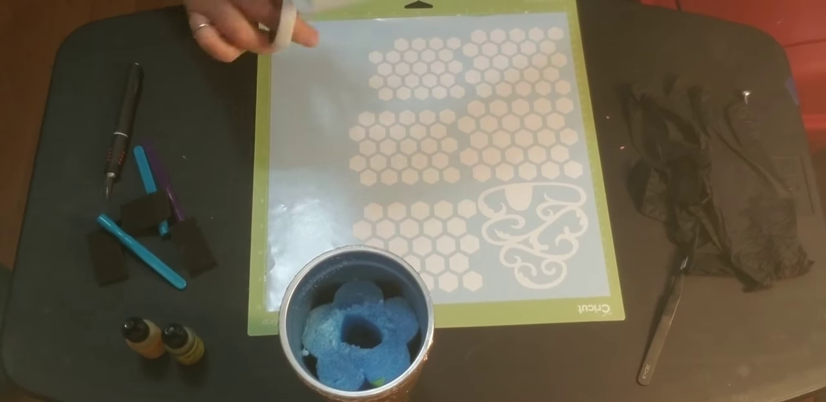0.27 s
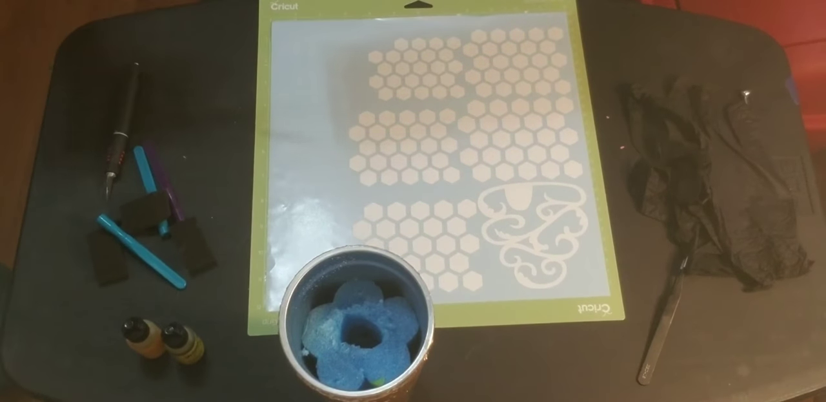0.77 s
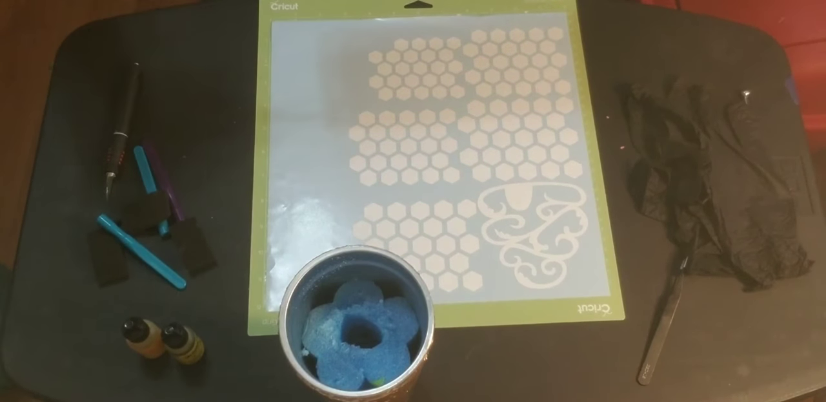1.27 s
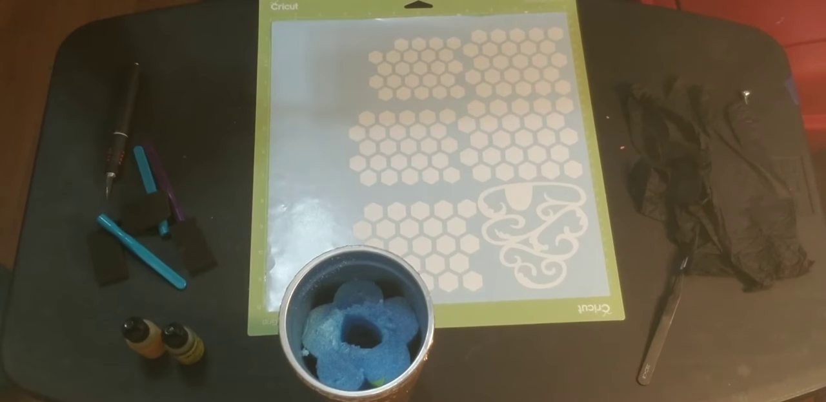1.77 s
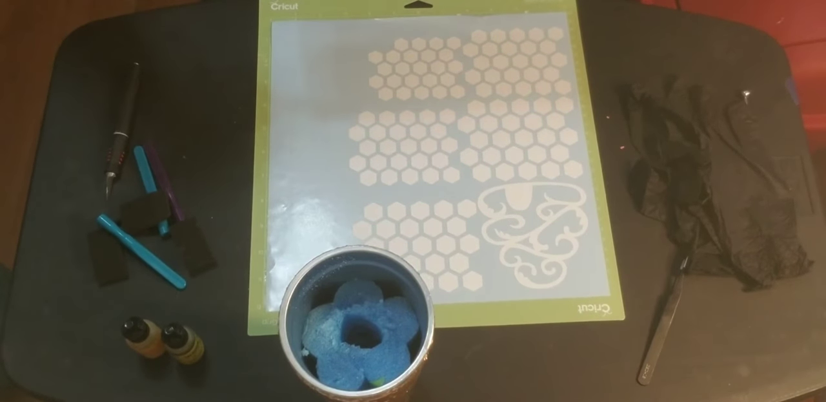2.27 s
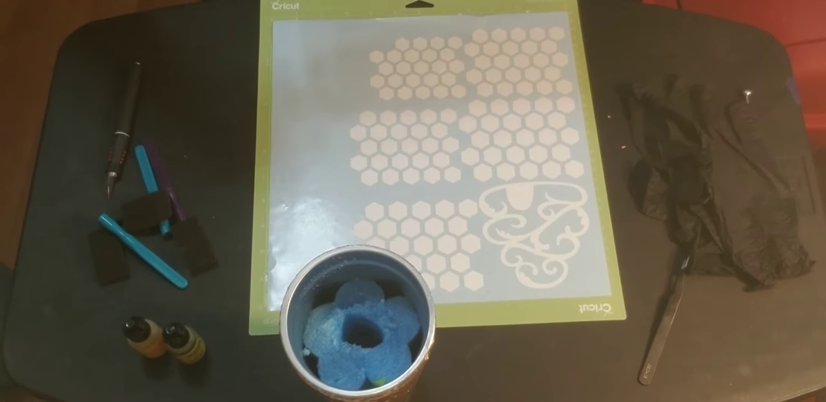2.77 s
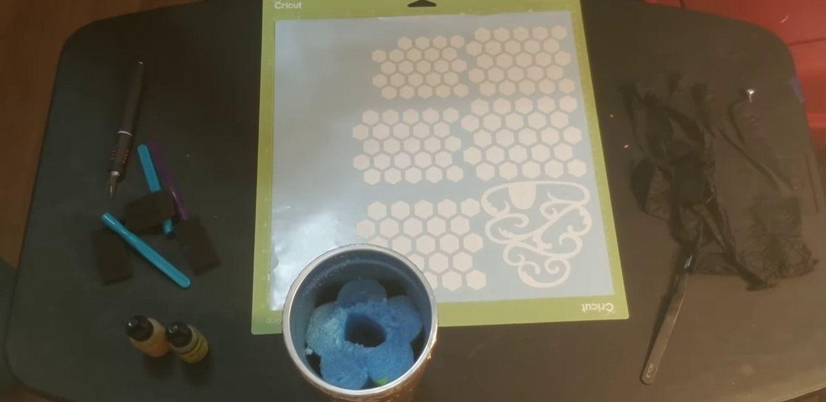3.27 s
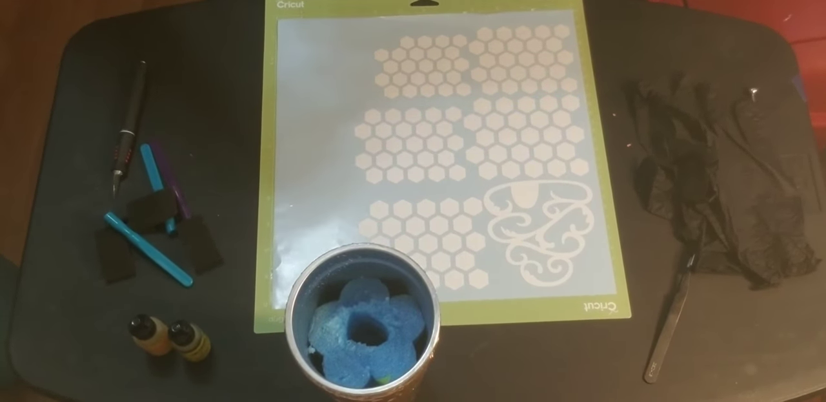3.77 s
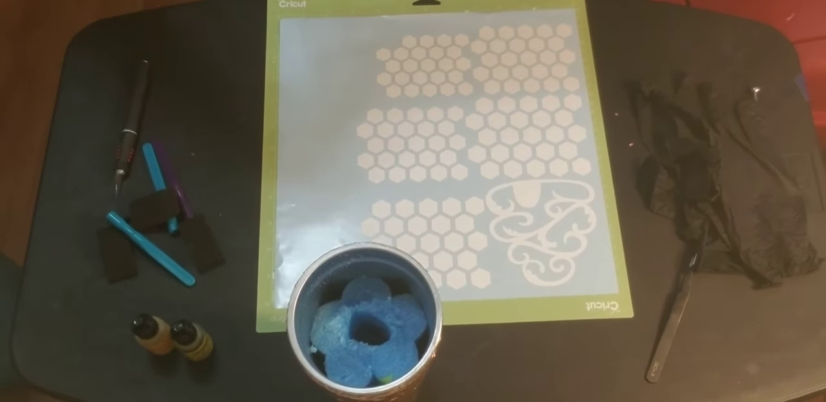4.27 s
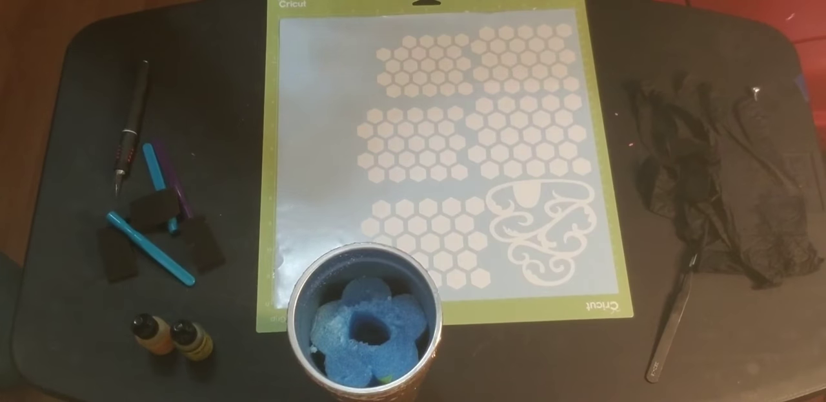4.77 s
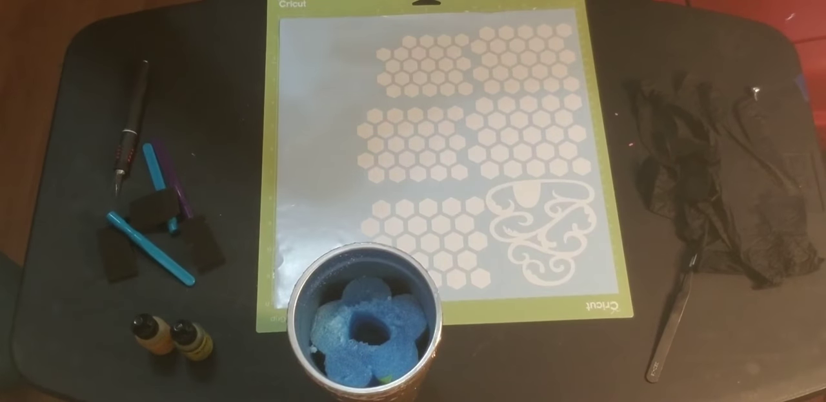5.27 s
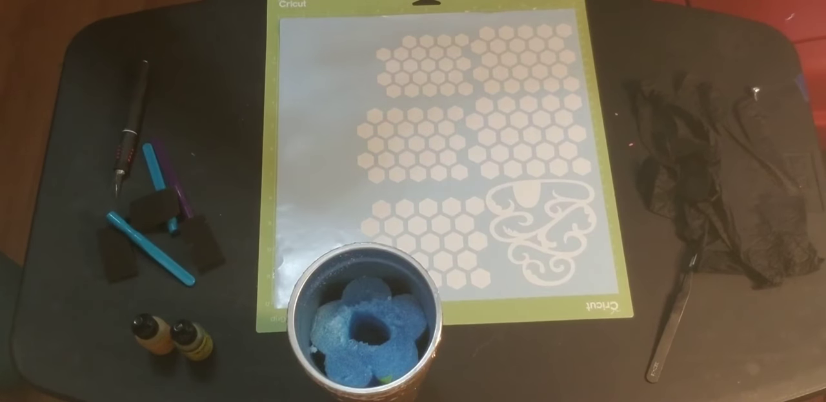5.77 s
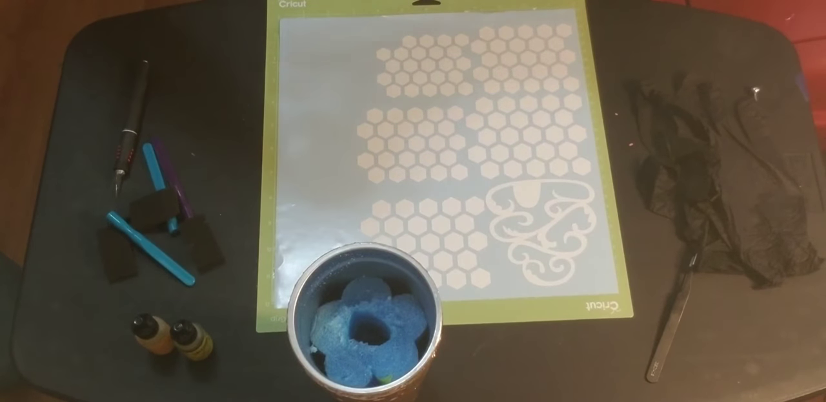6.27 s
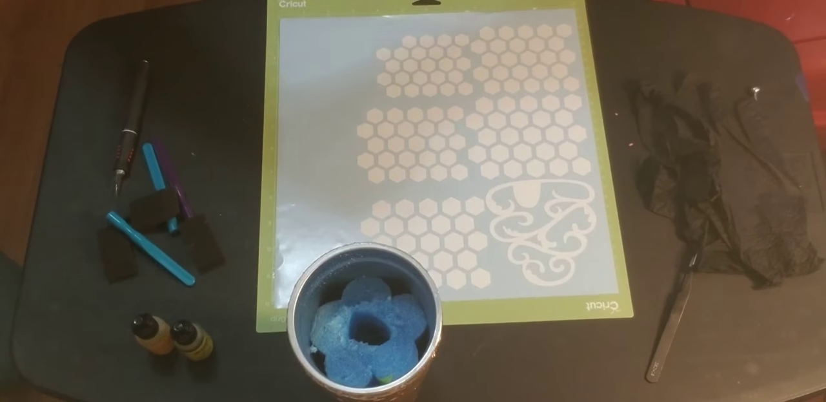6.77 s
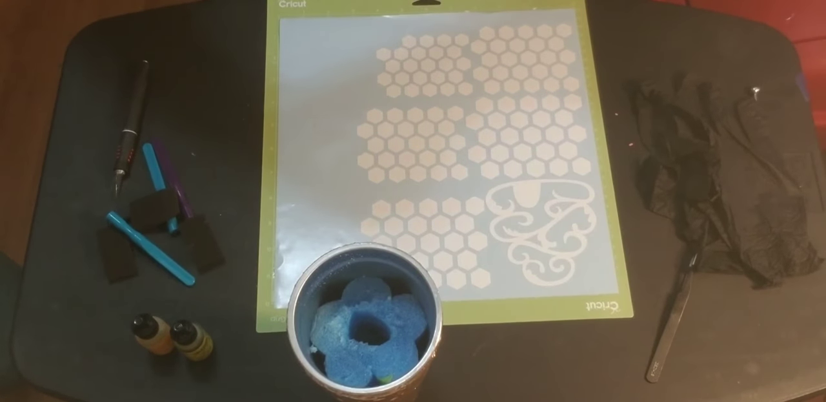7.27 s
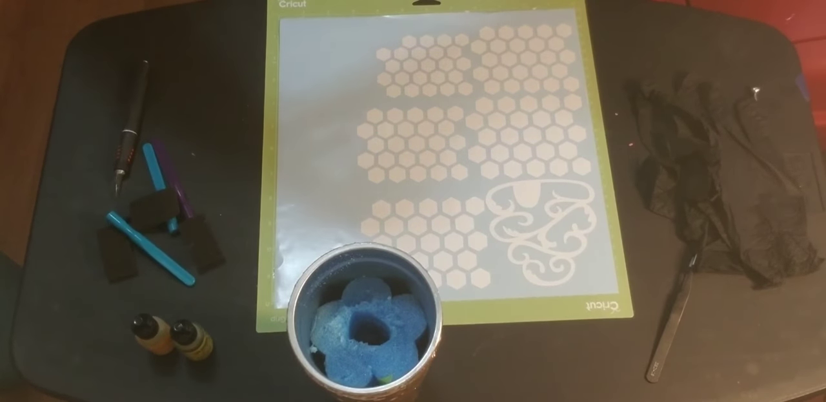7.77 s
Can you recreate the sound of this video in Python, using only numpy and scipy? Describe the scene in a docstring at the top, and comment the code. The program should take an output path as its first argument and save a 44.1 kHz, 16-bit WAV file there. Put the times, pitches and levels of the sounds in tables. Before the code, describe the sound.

Hands work a stiff clear plastic sheet beside a craft table. Faint rubbing and a few ticks come first, then a near lull, then stronger irregular rustles with crackles, creasing pops and short crunches. Soft low knocks fall underneath. Near the end the sheet is flicked sharply and settles. Close phone microphone, small room, short reflections, very quiet air and faint hum.

```python
"""A clear plastic transfer sheet, worked by hands beside a craft table, close to a phone in a small room.
Each stroke drags the film in a dense run of tiny slips that wake its resonances; slack film booms, taut
film rings, wrinkles tick. Creases buckle with single snaps or short crunches, and near the end the sheet
is flicked once. Table and walls answer; soft low knocks, still air and faint mains hum lie underneath."""
import sys
import numpy as np
from scipy import signal
from scipy.fft import rfft, irfft, next_fast_len
from scipy.io import wavfile

SR = 44100
rng = np.random.default_rng(int(sys.argv[2]) if len(sys.argv) > 2 else 0)


def wrap_up_sound(samples):
    """Save the sound to the file named by the first command line argument, as 16-bit audio."""
    columns = np.atleast_2d(samples).T
    # keep every value between -1 and 1, then stretch to whole-number steps
    tamed = np.clip(columns, -1, 1)
    steps = np.round(tamed * 32767).astype(np.int16)
    wavfile.write(sys.argv[1], SR, steps)


N = 353152
T = np.arange(N) / SR
SIZE = next_fast_len(N + SR)
FREQ = np.maximum(np.arange(SIZE // 2 + 1) * SR / SIZE, 1)

# hand strokes along the sheet: start t/s, rise/s, length/s, relative level/dB, swell over the stroke/dB,
# belly/dB, hiss/dB (belly and hiss against the 1-3 kHz rasp)
HAND_STROKES = [(0, 0.0013, 0.064, -48.5, -5, -6, 1), (0.06, 0.042, 0.28, -51.5, 4, -5, 3),
                (0.386, 0.0042, 0.034, -47, 2, 0, 4.5), (.47, .02, 0.052, -53, -2, -3.5, 4),
                (0.573, .02, 0.14, -54, -2.5, -8, 6.5), (1.218, 0.057, 0.12, -68, 1, -12, 24),
                (1.326, 0.045, 0.23, -55.5, -7, 7.5, 11.5), (1.526, 0.034, 0.099, -58, 9.5, 6, 14),
                (1.717, 0.079, 0.13, -41, 2.5, 1, 11.5), (1.96, 0.094, 0.14, -40, 3, -4.5, 1.5),
                (2.206, 0.033, 0.096, -39.5, -5, 3, 14), (2.377, 0.072, .21, -44.5, 2.5, 0, 1.5),
                (2.658, 0.011, 0.08, -32.5, 5.5, -3, 3.5), (2.86, 0.13, 0.23, -39.5, -7, -8.5, -7),
                (3.074, 0.0092, 0.16, -52.5, -8.5, 6.5, -1), (3.239, 0.044, 0.075, -35, 0, 0, 2.5),
                (3.475, 0.046, 0.14, -51, 12.5, 4, 3.5), (3.636, 0.017, 0.075, -46.5, -7, -1, 7),
                (3.766, 0.026, 0.14, -48.5, -8, -7.5, -3), (3.916, 0.018, 0.15, -49, -6, -3, 12),
                (4.015, 0.029, 0.058, -42.5, 3, -8, -2.5), (4.148, 0.048, 0.22, -38.5, -5, -9.5, 4),
                (4.428, 0.02, 0.062, -34, 2.5, -3, 4.5), (4.598, 0.11, .32, -45, -6, -2.5, -2.5),
                (4.951, 0.025, 0.064, -54, 6, -4, 6), (5.087, 0.023, .11, -37.5, 10, -9, 1.5),
                (5.243, 0.058, 0.06, -39, 2, 3, 4), (5.347, 0.019, 0.073, -44, -3, -2, 0.5),
                (5.529, 0.034, 0.082, -58.5, -4.5, -6, 1.5), (5.687, 0.032, 0.096, -51, -16.5, -15, 2),
                (5.832, 0.01, 0.19, -48.5, 13, -3, 1.5), (5.985, 0.16, 0.15, -42.5, 2, -3.5, -0.5),
                (6.23, 0.022, 0.16, -47.5, -8.5, -5, 0), (6.302, 0.022, 0.036, -37.5, 4, 7.5, 10),
                (6.447, 0.04, .18, -45, 7, 0, 6.5), (6.713, 0.023, 0.051, -37.5, -8, -5, 0.5),
                (6.89, 0.055, 0.1, -44, 9, -6.5, 5), (7.13, 0.0046, .018, -49, 5, -8, 8),
                (7.151, 0.0064, 0.05, -34.5, 3, -4, 5), (7.377, 0.024, 0.11, -51, -0.5, -4, 5),
                (7.632, 0.019, 0.019, -46.5, 4, -2, -2), (7.728, 0.025, 0.096, -41.5, -3.5, -5.5, -5),
                (7.992, 0.0035, 0.013, -49, 3, -10, 7)]
# taut stretches that ring while rubbed: start t/s, end t/s, f/Hz, width/Hz, level before trim/dB
TAUT_STRETCHES = [(0, .1, 3500, 900, -58), (.29, .335, 1920, 1500, -49), (1.32, 1.6, 4440, 1590, -56.5),
                  (2.44, 2.61, 1570, 400, -48), (2.88, 3.11, 1710, 750, -44),
                  (3.93, 4.27, 1950, 450, -50.5), (4.44, 4.52, 1470, 220, -41),
                  (4.65, 4.95, 1670, 710, -50), (6.03, 6.13, 1500, 200, -44),
                  (6.05, 6.14, 3100, 700, -40.5)]
# creases giving way together: t/s, relative level/dB, length/s, hiss against rasp/dB
CREASE_RUNS = [(0.4036, -43, 0.0088, 0), (0.666, -45.5, .0043, -12), (2.121, -38, 0.009, 4),
               (2.212, -40.5, 0.0049, 24), (2.661, -43, 0.0072, 14), (2.728, -29, 0.0047, -7),
               (3.262, -39.5, .011, -27), (4.446, -36, .011, -12), (4.478, -34, 0.011, 8),
               (4.5083, -33, 0.011, -1.5), (5.002, -50.5, 0.0062, -22), (5.181, -29.5, 0.01, 4),
               (5.195, -25.5, 0.004, -28), (5.291, -37.5, 0.0052, -20), (5.362, -37, 0.011, 2),
               (5.965, -45.5, 0.012, -8), (6.329, -33.5, 0.0054, 19), (6.775, -26, 0.0048, 7.5),
               (7.159, -40, 0.02, 10), (7.1882, -26.5, 0.012, 6), (7.7212, -32.5, 0.019, -32),
               (7.726, -19.5, 0.0062, 9), (7.7296, -34, 0.042, 25)]
# single creases popping over: t/s, level before trim/dB, belly/dB, hiss/dB, facet f/Hz
CREASE_POPS = [(0.1622, -9, -4, 10.5, 2200), (0.301, -13.5, 1, -19, 2450), (1.6183, -20.5, -9, 19, 680),
               (3.4491, -8, -18, -8, 1520), (3.5693, -6, -10, -6, 1540), (3.8541, -4.5, 3, 8, 2330),
               (4.9968, -14, -22, -40, 2080), (5.1791, -7, -1, -3, 1550), (5.7783, -20.5, 3, -22, 1030),
               (5.8923, -16.5, 4, 11, 645), (6.2527, -17, -13, 11, 2800), (7.0235, -19.5, 7, 5, 2120),
               (7.812, -9, 2, 12, 1070)]
# radiation of the sheet: f/Hz, density/(dB per Hz)
FILM_RADIATION = [(130, -54.5), (220, -20.5), (380, -11), (540, -12.5), (745, -1.5), (1030, -4),
                  (1470, -3.5), (2610, -4), (4810, -0.5), (8090, -13), (11000, -8), (16000, -16)]
# broad resonances of the sheet: f/Hz, width/Hz, lift/dB
FILM_MODES = [(418, 42, 2), (736, 66, -1), (1540, 110, 4.5), (2330, 150, 1.5), (3410, 52, 3.5)]
# soft hand knocks through the table: t/s, level/dB, f/Hz, 60 dB decay/s
HAND_KNOCKS = [(.062, -61, 59.6, 0.2), (3.624, -45, 170, 0.11), (3.654, -44, 135, 0.052),
               (4.874, -59, 135, 0.26), (5.192, -58, 150, 0.25), (6.331, -40.5, 397, 0.16),
               (6.777, -42.5, 492, 0.26), (7.732, -46, 333, 0.21), (6.782, -57, 61.7, .23),
               (7.202, -48.5, 67, 0.12), (7.201, -58, 179, 0.24), (7.735, -28.5, 79, 0.029),
               (7.736, -47, 190, 0.14)]
# spectrum of the quiet room: f/Hz, density/(dB per Hz)
STILL_AIR = [(15, -44), (25, -8), (43, -30), (76, -9.5), (123, -5), (141, -6), (236, -17), (641, -12),
             (1290, -20), (8590, -22.5), (16000, -27)]
# mains hum: f/Hz, rms level/dB
MAINS_HUM = [(60, -82), (118, -85)]
# colour of the two microphone ports: f/Hz, left/dB, right/dB
PORT_COLOUR = [(110, 5.5, 6), (407, -5, -0.5), (730, -7, -5.5), (1320, -5.5, -1.8), (1900, -2.5, 0),
               (3870, -4.5, -1.7), (4430, -6.5, -6), (7160, -4.5, 1), (9330, 1.5, -4.5), (11660, -2, -4.5),
               (13400, -4, -4)]

RUSTLE_DB = -2  # trim on rubbing and crunches
RELEASE_DB_PER_S = 342  # fall of the rubbing once the hand lets go
SETTLE_DB, SETTLE_DB_PER_S = -15, 89  # rustle of the settling film, against the stroke
USUAL_DB = -42  # level of an ordinary stroke
FLEX_DB, FLEX_DB_PER_DB = -14, -0.89  # flexing against rasp; firmer strokes pull the film tight
BELLY_HZ, BELLY_WIDTH_HZ, BELLY_DB = 680, 216, -8  # boom, against the rubbing in its register
AIR_DB = -69
TOP_HZ = 16000


def undb(db):
    """Decibels to gain."""
    return 10 ** (np.asarray(db) / 20)


def unit(x):
    """Scale to rms 1."""
    return x / np.sqrt(np.mean(np.abs(x) ** 2) + 1e-18)


def walk(rate_hz):
    """Smooth random wander with an rms of 1."""
    knots = rng.standard_normal(N // 10)
    return unit(np.interp(T * rate_hz, np.arange(N // 10), knots))


def contour(points, column=1):
    """Table of (Hz, dB) as dB at every frequency, interpolated over log frequency."""
    points = np.array(points)
    return np.interp(np.log(FREQ), np.log(points[:, 0]), points[:, column])


def below(hz, order=4):
    """Share of the power that a low-pass lets through."""
    return 1 / (1 + (FREQ / hz) ** (2 * order))


def causal(db):
    """Minimum-phase response with this dB gain: it rings after a blow, never before."""
    cepstrum = irfft(db * np.log(10) / 20, SIZE)
    cepstrum[1:SIZE // 2] *= 2
    cepstrum[SIZE // 2 + 1:] = 0
    return np.exp(rfft(cepstrum))


def through(x, response):
    """Filter by a frequency response."""
    return irfft(rfft(x, SIZE) * response, SIZE)[..., :N]


def resonance(hz, width_hz):
    """Response of one damped mode, scaled to unit power."""
    return unit(1 / (1 + 1j * (FREQ / hz - hz / FREQ) * hz / width_hz))


def voice(flex_db, belly_db, hiss_db, edge_db=-2.0):
    """Gains of flexing, belly, rasp, edge and hiss, total power 1; the edge follows half the hiss."""
    gains = undb([flex_db, belly_db, 0, edge_db + hiss_db / 2, hiss_db])
    return gains / np.sqrt(np.sum(gains ** 2))


def strokes(rise_power=1.05):
    """Rubbing amplitude per register: a stroke picks up, swells or eases, lets go; the film settles."""
    power, t = np.zeros((5, N + SR)), T[:SR]
    for start_s, rise_s, length_s, db, swell_db, belly_db, hiss_db in HAND_STROKES:
        travel = np.minimum(t / length_s, 1)
        after_s = np.maximum(t - length_s, 0)
        let_go = undb(-RELEASE_DB_PER_S * after_s)
        settling = undb(SETTLE_DB - SETTLE_DB_PER_S * after_s)
        shape = np.minimum(t / rise_s, 1) ** rise_power
        shape = shape * undb(swell_db * (travel - .5)) * np.maximum(let_go, settling)
        flex_db = FLEX_DB + FLEX_DB_PER_DB * (db - USUAL_DB)
        colour = voice(flex_db, belly_db, hiss_db)
        start = int(start_s * SR)
        power[:, start:start + len(t)] += np.outer(colour, shape * undb(db)) ** 2
    return np.sqrt(power[:, :N])


def rubbing(drive, effort, slips_per_s=2000, uneven_db=2.5, smooth_db=-2.5,
            judder_db=0.86, flicker_db=2.36, trim_db=-1.88):
    """Film catches and slips, more often under harder strokes; registers flicker as the sheet bends."""
    rate = slips_per_s * np.sqrt(np.maximum(effort / undb(USUAL_DB), 1 / 20))
    sizes = undb(uneven_db * np.minimum(rng.exponential(size=N), 4.8))
    sizes = sizes * rng.choice([-1, 1], N)
    # division by sqrt(rate) keeps the power independent of the slip rate
    slips = unit((rng.random(N) < rate / SR) * sizes / np.sqrt(rate))
    friction = unit(slips + undb(smooth_db) * rng.standard_normal(N))
    force = friction * undb(trim_db + judder_db * walk(95))
    return np.array([force * gain * undb(flicker_db * walk(38)) for gain in drive])


def ringing(fade_s=0.028, trim_db=-1, flicker_db=2.0):
    """Friction shakes each taut stretch at its own resonance; one spectrum per patch of film."""
    spectra = np.zeros((3, len(FREQ)), complex)
    friction = undb(flicker_db * walk(60)) * rng.standard_normal(N)
    for row, (start_s, end_s, hz, width_hz, db) in enumerate(TAUT_STRETCHES):
        contact = np.clip(np.minimum(T - start_s, end_s - T) / fade_s, 0, 1)
        shake = rfft(contact * friction, SIZE)
        spectra[row % 3] += undb(db + trim_db) * resonance(hz, width_hz) * shake
    return spectra


def booming(drive, flicker_db=3, tension_spread=.025):
    """Spectrum of one slack patch: belly friction wakes a narrow band, at one pitch for all strokes."""
    shake = drive[1] * undb(BELLY_DB + flicker_db * walk(30)) * rng.standard_normal(N)
    hz = BELLY_HZ * np.exp(tension_spread * rng.standard_normal())
    belly = resonance(hz, BELLY_WIDTH_HZ)
    return unit(belly ** 2) * rfft(shake, SIZE)


def crackles(effort, count=600, over_db=-1, uneven_db=3, low_hz=1450, octaves=2.53, cycles=2.2):
    """Wrinkles tick at random times, scaled by the stroke, each a damped cosine at its own pitch."""
    out, t = np.zeros(N + SR), T[:SR // 100]
    for when, pitch, size in rng.random((count, 3)):
        start = int(when * N)
        hz = low_hz * 2 ** (octaves * pitch)
        gain = effort[start] * undb(over_db - uneven_db * np.log(size + .02))
        tick = np.cos(2 * np.pi * hz * t) * np.exp(-t * hz / cycles)
        out[start:start + len(t)] += gain * tick
    return out[:N]


def crunches(uneven_db=4.0, flex_db=-11, belly_db=-4.0):
    """An avalanche of small buckles, a few of them much larger than the rest."""
    force, t = np.zeros((5, N)), T[:SR // 10]
    for start_s, db, length_s, hiss_db in CREASE_RUNS:
        sizes = undb(uneven_db * np.minimum(rng.exponential(size=len(t)), 3.8))
        sizes = sizes * rng.choice([-1, 1], len(t))
        run = (rng.random(len(t)) < .15) * sizes * np.exp(-(t / length_s) ** 4)
        run *= np.sqrt(length_s * SR / (np.sum(run ** 2) + 1e-18))  # rms 1 over its length
        colour = voice(flex_db, belly_db, hiss_db)
        start = int(start_s * SR)
        force[:, start:start + len(t)] += np.outer(colour, run * undb(db))
    return force


def snaps(trim_db=-6.5, chatter_s=0.0036, chatter_db=-22, facet_db=-18, facet_s=0.00064, flex_db=-15):
    """A crease flips in one sharp impulse; the facet beside it rings briefly and chatters as it settles."""
    force, t = np.zeros((5, N)), T[:SR // 100]
    for start_s, db, belly_db, hiss_db, hz in CREASE_POPS:
        pop = undb(chatter_db) * rng.standard_normal(len(t)) * np.exp(-t / chatter_s)
        pop += undb(facet_db) * np.cos(2 * np.pi * hz * t) * np.exp(-t / facet_s)
        pop[0] += 1
        colour = voice(flex_db, belly_db, hiss_db)
        start = int(start_s * SR)
        force[:, start:start + len(t)] += np.outer(colour, pop * undb(db + trim_db))
    return force


def sheet_zones():
    """Five film registers of unit power, softly overlapping: flexing, belly, rasp, edge, hiss."""
    db = contour(FILM_RADIATION)
    for hz, width_hz, lift_db in FILM_MODES:
        db = db + lift_db / (1 + (2 * (FREQ - hz) / width_hz) ** 2)
    film = causal(db)
    # the first border is the low end of the flexing
    borders = [below(hz, order=2) for hz in (260, 520, 1100, 3000, 5200)] + [1]
    return [unit(film * (1 - low) * high) for low, high in zip(borders, borders[1:])]


def spread_out(sound, scatter_hz=2500):
    """The whole sheet radiates at once, so its treble reaches each port with its own phase."""
    knots_hz = np.arange(0, SR, 300)
    phases = np.array([np.interp(FREQ, knots_hz, 3.28 * rng.standard_normal(len(knots_hz)))
                       for _ in range(2)])
    return sound * np.exp(1j * phases * (1 - below(scatter_hz, order=1)))


def direct(table_s=0.00136, table_db=-7):
    """The straight path and one bounce off the table; the left port hears both a little earlier."""
    port_lag_s = np.array([[0], [1.5 / SR]])
    bounce = undb(table_db) * np.exp(-2j * np.pi * FREQ * table_s)
    return np.exp(-2j * np.pi * FREQ * port_lag_s) * (1 + bounce)


def bumps(push_s=0.01):
    """Soft blows of the hands that wake one low, damped mode each."""
    out, t = np.zeros(N + SR), T[:SR // 2]
    for start_s, db, hz, t60_s in HAND_KNOCKS:
        envelope = (1 - np.exp(-t / push_s)) * np.exp(-np.log(1000) * t / t60_s)
        start = int(start_s * SR)
        out[start:start + len(t)] += undb(db) * np.sin(2 * np.pi * hz * t) * envelope
    return out[:N]


def ports_alike(pair, split_hz):
    """Spectra at the two ports: long waves reach both much alike, short ones differ."""
    left, right = rfft(pair, SIZE)
    alike = .86 * below(split_hz, order=1)
    return np.array([left, alike * left + np.sqrt(1 - alike ** 2) * right])


def room(mid_t60_s=0.31, treble_t60_s=0.31, walls_db=-1.5, close_db=-0.5, close_s=0.0038,
         build_s=0.0095, split_hz=1250):
    """Scatter from the table and things close by, then the short tail of the walls."""
    t = T[:SR // 2]
    noise = rng.standard_normal((3, 2, len(t)))
    close = unit(ports_alike(noise[0] * t * np.exp(-2 * t / close_s), 0.93 * split_hz))

    def tail(pair, t60_s):
        """Noise that builds up, then dies away exponentially."""
        envelope = np.exp(-np.log(1000) * t / t60_s) * np.minimum(t / build_s, 1)
        return unit(ports_alike(pair * envelope, split_hz))

    mid, treble = tail(noise[1], mid_t60_s), tail(noise[2], treble_t60_s)
    dull = below(5400, order=1)
    walls = np.sqrt(dull) * mid + np.sqrt(1 - dull) * treble
    return undb(close_db) * close + undb(walls_db) * walls


def quiet_room():
    """Still air as shaped noise, and a slightly wavering mains hum."""
    noise = ports_alike(rng.standard_normal((2, N)), 450)
    air = irfft(noise * undb(contour(STILL_AIR)), SIZE)[:, :N]
    hum = np.zeros(N)
    for hz, db in MAINS_HUM:
        hum += np.sqrt(2) * undb(db + 0.57 * walk(7.4)) * np.sin(2 * np.pi * hz * T)
    return unit(air) * undb(AIR_DB) + hum


def scene():
    """All sheet sounds over knocks and room; each of three patches has its own paths to the microphone."""
    zones, drive = np.array(sheet_zones()), strokes()
    effort = np.linalg.norm(drive, axis=0) + 1e-18
    force = (rubbing(drive, effort) + crunches()) * undb(RUSTLE_DB)
    place = rng.integers(3, size=N)  # patch on which each sample of force lands
    sheet, rings = 0, ringing()
    for patch in range(3):
        echoes = room()
        rustle = np.sum(rfft(force * (place == patch), SIZE) * zones, axis=0)
        rustle = rustle + rings[patch] + booming(drive) + rfft(crackles(effort), SIZE)
        sheet = sheet + spread_out(rustle) + rustle * echoes
    # a snap comes from one spot: sharp straight path, echoes of the last patch
    pops = np.sum(rfft(snaps(), SIZE) * zones, axis=0)
    sheet = sheet + pops * (direct() + echoes)
    return irfft(sheet, SIZE)[:, :N] + bumps() + quiet_room()


def record(dry):
    """Each port colours the sound; the phone cuts the top with a steep low-pass."""
    ports = np.array([causal(contour(PORT_COLOUR, column=k)) for k in (1, 2)])
    coloured = through(dry, ports)
    top_cut = signal.ellip(10, .2, 70, TOP_HZ, fs=SR, output="sos")
    return signal.sosfilt(top_cut, coloured)


dry = scene()
out = record(dry)
wrap_up_sound(out)
```